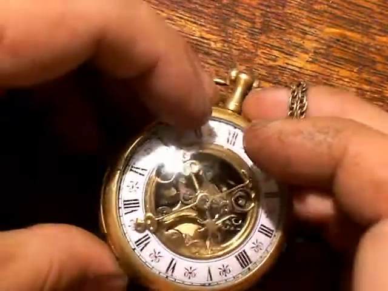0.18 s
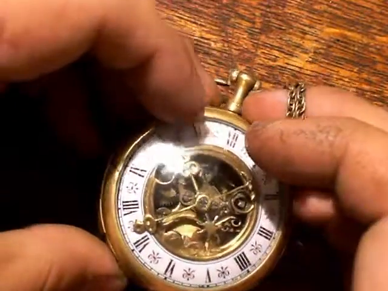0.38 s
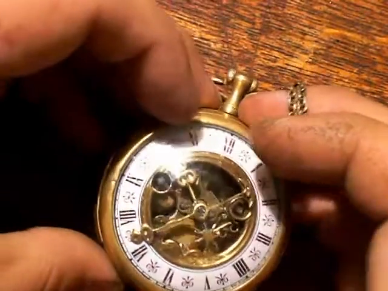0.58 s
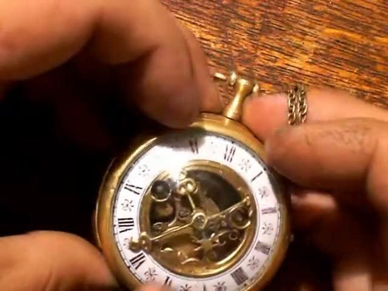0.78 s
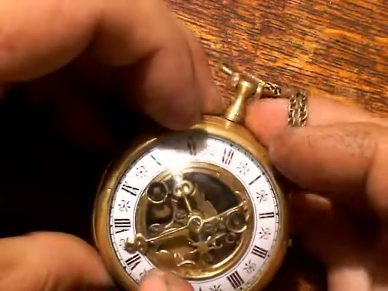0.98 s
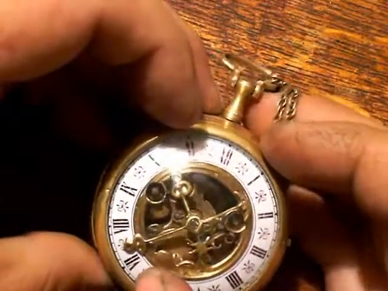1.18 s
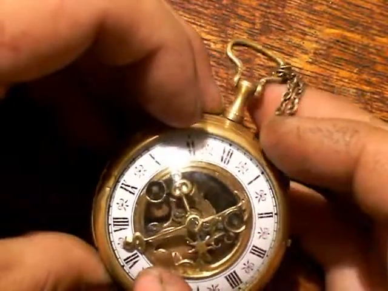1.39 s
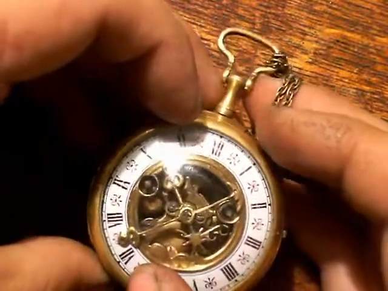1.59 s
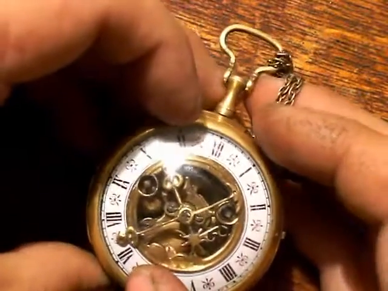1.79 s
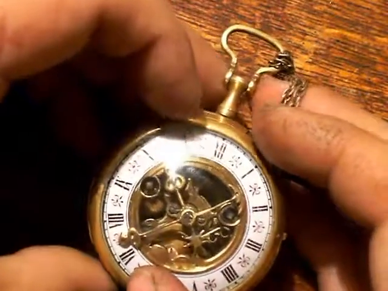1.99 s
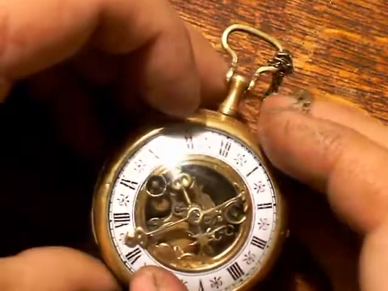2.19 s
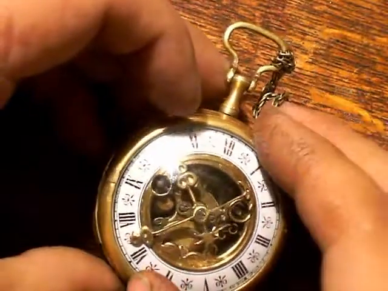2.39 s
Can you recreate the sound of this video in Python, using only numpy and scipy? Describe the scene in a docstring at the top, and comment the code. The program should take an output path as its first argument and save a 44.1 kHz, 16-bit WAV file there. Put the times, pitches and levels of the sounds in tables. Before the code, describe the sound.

One sharp, close metal snap sounds as a pocket watch closes in a quiet room. Fingers then bump and rub the case lightly, while its small parts and chain tick faintly and irregularly over low hiss.

```python
"""A sharp metal snap, close by: the lid of a brass pocket watch shuts over a wooden table in a quiet room.
The catch cracks, the case rings and the room answers. Fingers bump and rub the case, and the bow
scrapes round in its hinge in tiny slips that sometimes stick and squeak. The watch and its chain
give faint, uneven metal ticks over a steady hiss."""
import sys
import numpy as np
from scipy import signal
from scipy.fft import rfft, irfft
from scipy.io import wavfile

SR = 44100
rng = np.random.default_rng(int(sys.argv[2]) if len(sys.argv) > 2 else 0)


def pcm_store(signal):
    """Save signal as 16-bit PCM."""
    levels = np.round(np.clip(np.atleast_2d(signal), -1, 1) * 32767)
    wavfile.write(sys.argv[1], SR, levels.astype(np.int16).T)


N = 110250
TIME = np.arange(N) / SR

# the lid hits and settles (time [s], level [dB])
LID_HITS = [(0.1998, 1), (0.2025, 2.5), (0.2043, -4), (0.21, -23)]
# ring of the closed case in the hand (pitch [Hz], level [dB], t60 [s])
CASE_MODES = [(258, -27, 0.081), (348, -20.5, 0.035), (472, -21.5, 0.016), (635, -28.5, 0.039),
              (1060, -23, 0.022), (1254, -14.5, 0.026), (1316, -26, 0.17), (1600, -32, 0.049),
              (2020, -47, 0.074), (2330, -41, 0.035), (3160, -39.5, 0.02), (5250, -47.5, 0.0071),
              (6650, -35.5, 0.0074)]
SNAP_S = LID_HITS[0][0]


def lid_snap():
    """The lid cracks over its catch and seats in a few quick hits that ring the case."""
    crack_db, crack_decay_s = -41.5, 0.0074
    age = TIME - SNAP_S
    grit = rng.standard_normal(N) * (age > 0) * np.exp(-np.abs(age) / crack_decay_s)
    crack = from_db(crack_db) * band_pass(grit, low_hz=3100, high_hz=7400)
    force = sum(from_db(db) * click(s) for s, db in LID_HITS)
    return body(force, CASE_MODES) + crack


# sustain after the snap (pitch [Hz], level [dB], t60 [s])
SUSTAIN_MODES = [(114.3, -45.5, 0.4), (338.3, -29, 0.24), (880, -51, 0.41), (1193, -40.5, 0.12),
                 (6670, -49, 0.09)]
# low ring of the watch shifting in the hand (pitch [Hz], level [dB], t60 [s])
SHIFT_MODES = [(109, -48, 0.37), (230.7, -46, 0.22)]


def lingering_rings():
    """The watch rings on after the snap, and again when it shifts as the bow turns."""
    rings = body(click(SNAP_S), SUSTAIN_MODES) + body(click(s=1.098), SHIFT_MODES)
    return low_cut(rings, hz=175)


# finger bumps (time [s], level [dB], brightness [Hz])
BUMPS = [(0.618, -49, 1500), (0.649, -44, 600), (0.777, -48.5, 1200), (0.823, -48, 1200),
         (0.8955, -37.5, 6000), (0.93, -50, 500), (0.984, -46.5, 1540), (1.002, -36.5, 403),
         (1.025, -51, 593), (1.088, -45.5, 600), (1.85, -51.5, 710), (2.426, -45, 596)]
# dull body of a bump (pitch [Hz], level [dB], t60 [s])
BUMP_MODES = [(103, -12, 0.19), (234, -15.5, 0.25), (351, 4, 0.026), (435, -10.5, 0.014), (927, -4, 0.011),
              (1270, -7.5, 0.022), (1695, -6.5, 0.015), (2500, 1.5, 0.0033)]


def finger_bumps():
    """Soft fingertips knock on the hand-damped case."""
    force = sum(from_db(db) * soften(click(s), hz) for s, db, hz in BUMPS)
    return body(force, BUMP_MODES)


# hard touches on the rim (time [s], level [dB])
RIM_TOUCHES = [(0.1045, -27), (1.0992, -19), (1.1125, -21), (2.0723, -25)]


def rim_clicks():
    """Hard contacts on the held rim give dry midrange clicks with no ring."""
    force = sum(from_db(db) * click(s) for s, db in RIM_TOUCHES)
    return band_pass(force, low_hz=630, high_hz=3000)


# ticks of watch and chain (time [s], level [dB], colour centre [Hz])
TICKS = [(0.104, -42.5, 4400), (0.1158, -39.5, 6100), (0.45, -49, 5630), (0.700, -51.5, 6600),
         (0.795, -43.5, 5850), (0.8935, -41.5, 4770), (1, -52.5, 6700), (1.0933, -41, 6700),
         (1.1053, -39.5, 6500), (1.183, -41, 6530), (1.344, -46.5, 4560), (1.593, -44, 4700),
         (1.5965, -39.5, 4670), (2.0396, -44.5, 5800), (2.0715, -50.5, 5700), (2.226, -38, 5240),
         (2.2902, -41.5, 5150), (2.322, -36.5, 4950), (2.446, -40.5, 6160)]
# bright ring of the small brass parts (pitch [Hz], level [dB], t60 [s])
BRASS_MODES = [(2810, 0.5, 0.0092), (3645, -4.5, 0.0089), (4040, -6, 0.018), (4495, -6, .017),
               (4780, -11.5, .018), (5240, -8, 0.013), (5740, -4, 0.013), (6240, 0, 0.0062),
               (6780, -7, 0.02)]


def metal_ticks():
    """Small parts touch and chatter in tiny bounces, favouring the modes near each tick's colour."""
    width_oct, chatter_decay_s, chatter_db = 0.53, 0.0039, -16
    forces = np.zeros((len(BRASS_MODES), N))
    mode_hz = np.array(BRASS_MODES)[:, 0]
    age = TIME[:SR // 40]
    for s, db, hz in TICKS:
        contact = from_db(chatter_db) * rng.standard_normal(len(age)) * np.exp(-age / chatter_decay_s)
        contact[0] = 1  # the attack, ahead of the chatter
        contact /= np.linalg.norm(contact)
        weights = from_db(db) / (1 + (np.log2(mode_hz / hz) / width_oct) ** 2)
        start = int(s * SR)
        forces[:, start:start + len(age)] += np.outer(weights, contact)[:, :N - start]
    return sum((-1) ** k * from_db(db) * ring(forces[k], hz, t60)
               for k, (hz, db, t60) in enumerate(BRASS_MODES))


# skin and metal slide on the case (peak time [s], half length [s], level [dB], ring [Hz], treble [dB])
RUBS = [(0.576, 0.018, -63.5, 1670, -2), (0.621, 0.013, -66, 1720, -9), (0.657, 0.016, -67, 1720, 3),
        (0.697, 0.0086, -62.5, 1610, 2), (0.778, 0.0085, -69, 1720, 2), (0.822, 0.022, -64, 1724, 2),
        (0.9, 0.027, -73, 1720, 3), (1.1042, 0.007, -49, 1730, 4.5), (1.315, 0.025, -74, 1600, 9.5),
        (1.59, 0.023, -74, 1680, 9.5), (2.24, 0.034, -76, 1630, 17.5), (2.319, 0.025, -76, 1670, 16),
        (2.424, 0.02, -77, 1650, 15.5)]


def rubs():
    """Dense tiny slips swell and fade, exciting one clear ring, the case and the small brass parts."""
    slips_per_s, slip_spread_db, ring_t60_s = 2000, 0.5, 0.028
    rasp_db, body_db = -1, 1.5
    slips = (rng.random(N) < slips_per_s / SR) * rng.choice([-1, 1], N)
    slips = slips * from_db(slip_spread_db * rng.standard_normal(N))
    jerks = np.diff(slips, prepend=0)
    rasp = from_db(rasp_db) * rms_one(band_pass(slips, low_hz=2000, high_hz=7600))
    bright = rms_one(rms_one(body(jerks, BRASS_MODES)) + rasp)
    dull = from_db(body_db) * rms_one(body(jerks, BUMP_MODES))
    slides = np.zeros(N)
    for s, half_s, db, hz, treble_db in RUBS:
        clear = rms_one(ring(slips, hz, ring_t60_s))
        slides += swell(s, half_s, db) * (clear + dull + from_db(treble_db) * bright)
    return slides


# tiny squeaks (peak time [s], half length [s], level [dB], pitch [Hz])
SQUEAKS = [(0.703, 0.0043, -52, 1674), (0.785, 0.0056, -60.5, 1734), (1.119, 0.0045, -49, 1735)]


def squeaks():
    """The case sings a brief pure tone where a slide sticks."""
    return sum(swell(s, half_s, db) * np.sin(2 * np.pi * hz * TIME) for s, half_s, db, hz in SQUEAKS)


# grip changes (peak time [s], half length [s], level [dB])
GRIP_CHANGES = [(0.09, 0.11, -66), (0.65, 0.076, -63.5)]


def hand_rumble():
    """The hands change grip with a soft low rumble."""
    rumble = rms_one(band_pass(rng.standard_normal(N), low_hz=91, high_hz=234))
    return sum(swell(*change) for change in GRIP_CHANGES) * rumble


# colour and length of the reverb (frequency [Hz], level [dB], t60 [s])
ROOM_TAIL = [(101.6, -15.5, 0.18), (247, 0, 0.25), (350, -5, 0.26), (480, -0.5, 0.34), (680, -3.5, 0.32),
             (900, 1, 0.4), (1200, -4, 0.26), (1970, -5, 0.34), (3270, -11, 0.15), (6500, -8, 0.17)]


def room_reverb(send):
    """Reflections merge into a diffuse tail that builds quickly and dies band by band."""
    return_db, predelay_s, build_s = -3.5, 0.0069, 0.00078
    age = np.maximum(TIME[:SR // 2] - predelay_s, 0)
    onset = 1 - np.exp(-age / build_s)
    white = rfft(rng.standard_normal(len(age)))
    hz = np.fft.rfftfreq(len(age), 1 / SR)
    edges_hz = np.geomspace(70, 8000, 19)
    tail = np.zeros(len(age))
    for low, high in zip(edges_hz, edges_hz[1:]):
        centre = np.sqrt(low * high)
        decay = from_db(-60 * age / at_hz(ROOM_TAIL, centre, column=2))
        band = irfft(white * (hz >= low) * (hz < high), len(age)) * onset * decay
        band *= np.sqrt(2 * (high - low) / SR) / np.linalg.norm(band)  # unity gain within the band
        tail += from_db(at_hz(ROOM_TAIL, centre)) * band
    return from_db(return_db) * signal.fftconvolve(send, tail)[:N]


# EQ curve of the noise bed (frequency [Hz], relative level [dB])
HISS_EQ = [(15, -47), (30, -11.5), (55, -6), (100, -4.5), (190, -1), (270, -1), (360, -1.5), (500, -5.5),
           (800, -7), (1500, -10), (2800, -14), (6900, -15), (9000, -22)]


def hiss(level_db=-59.5):
    """A steady bed of room rumble and microphone hiss."""
    colour = from_db(at_hz(HISS_EQ, np.fft.rfftfreq(N, 1 / SR)))
    white = rfft(rng.standard_normal(N))
    return from_db(level_db) * rms_one(irfft(white * colour, N))


def from_db(db):
    """Decibels to gain."""
    return 10 ** (np.asarray(db) / 20)


def rms_one(x):
    """Scale to rms 1."""
    return x / np.sqrt(np.mean(x ** 2) + 1e-20)


def at_hz(points, hz, column=1):
    """Read a column of a table on a log-frequency axis."""
    table = np.array(points)
    return np.interp(np.log(hz + 1e-9), np.log(table[:, 0]), table[:, column])


def click(s):
    """A unit impulse at a time in seconds."""
    return np.maximum(0, 1 - np.abs(TIME - s) * SR)


def swell(s, half_s, db):
    """A bell-shaped fade in and out."""
    return from_db(db) * np.exp(-.5 * ((TIME - s) / half_s) ** 2)


def ring(force, hz, t60):
    """One mode: a unit click starts a decaying sine of height 1."""
    radius, angle = from_db(-60 / (t60 * SR)), 2 * np.pi * hz / SR
    return signal.lfilter([0, np.sin(angle)], [1, -2 * radius * np.cos(angle), radius ** 2], force + 1e-18)


def body(force, modes):
    """Modes ring in parallel."""
    return sum(from_db(db) * ring(force, hz, t60) for hz, db, t60 in modes)


def soften(force, hz):
    """A soft contact loses its treble."""
    pole = np.exp(-2 * np.pi * hz / SR)
    return signal.lfilter([1 - pole], [1, -pole], force + 1e-18)


def band_pass(x, low_hz, high_hz):
    """Keep a broad band."""
    return signal.sosfilt(signal.butter(2, [low_hz, high_hz], "band", fs=SR, output="sos"), x + 1e-18)


def low_cut(x, hz):
    """Roll off the bass."""
    return signal.sosfilt(signal.butter(2, hz, "high", fs=SR, output="sos"), x)


def scene():
    """The watch up front, the room behind it and the noise bed underneath, in mono."""
    bass_edge_hz = 296  # the small case radiates little below this
    lid_send_db, spread_send_db = -11, 18
    handling_send_db = -2.5  # the hands shield the small sounds from the room
    lid = low_cut(lid_snap(), bass_edge_hz)
    handling = low_cut(finger_bumps() + rim_clicks() + metal_ticks() + rubs() + squeaks(), bass_edge_hz)
    spread = band_pass(click(SNAP_S), low_hz=270, high_hz=1360)  # the snap's mids go in all directions
    send = from_db(spread_send_db) * spread + from_db(lid_send_db) * lid
    send += from_db(handling_send_db) * handling
    return (lid + handling + lingering_rings() + room_reverb(send) + hand_rumble() + hiss())[None]


def record(dry):
    """A narrow-band recorder cuts the top off steeply."""
    cutoff_hz = 7180
    return signal.sosfilt(signal.cheby2(24, 45, cutoff_hz, fs=SR, output="sos"), dry)


dry = scene()
out = record(dry)
pcm_store(out)
```